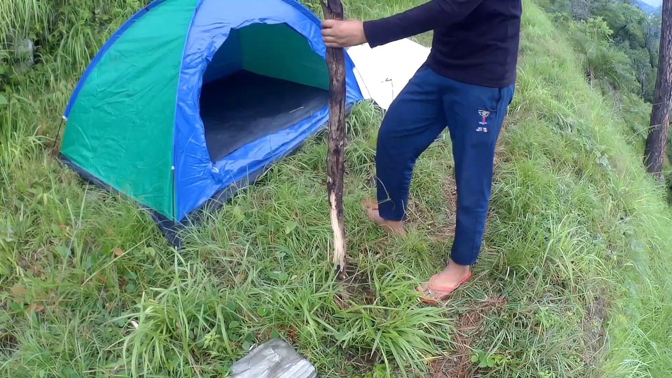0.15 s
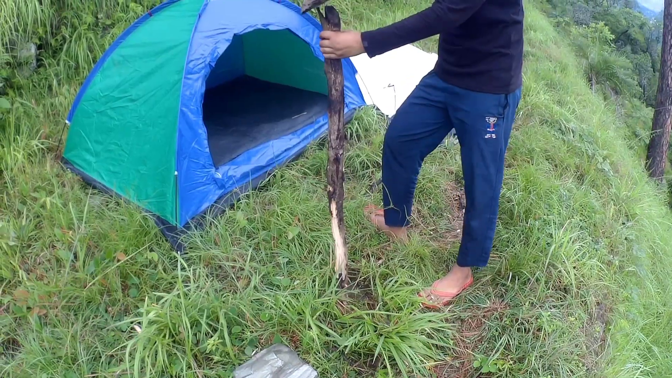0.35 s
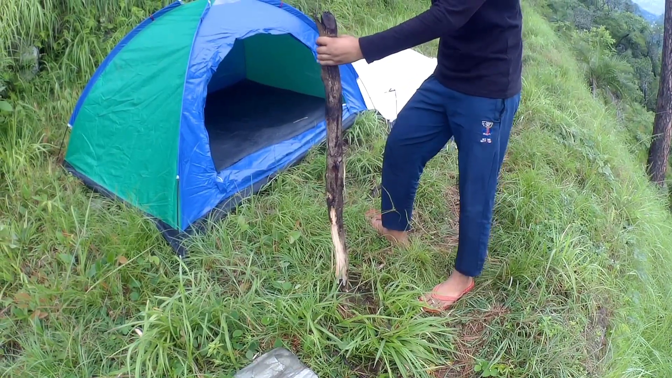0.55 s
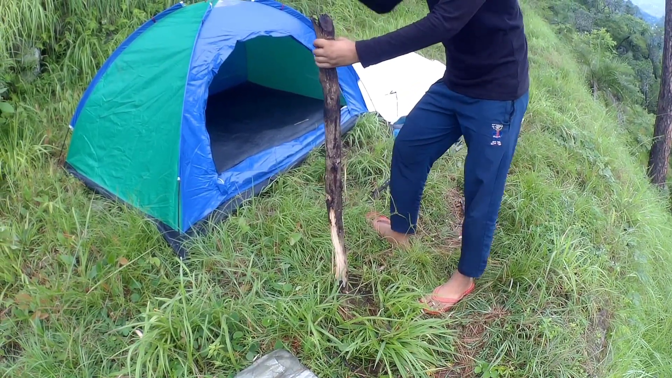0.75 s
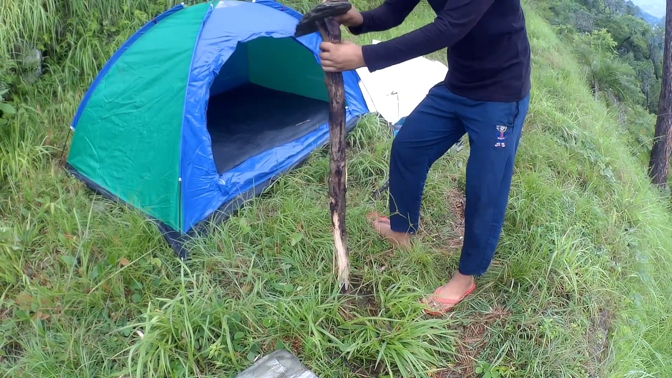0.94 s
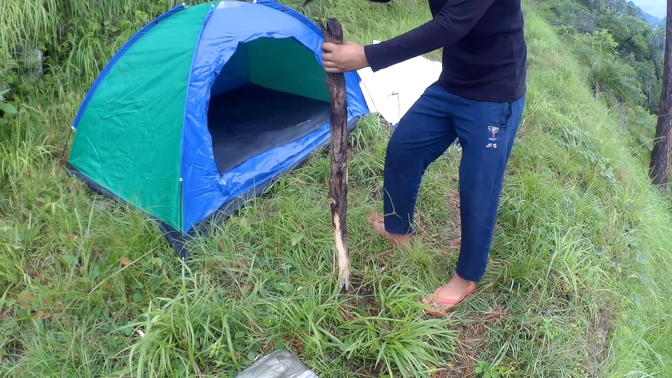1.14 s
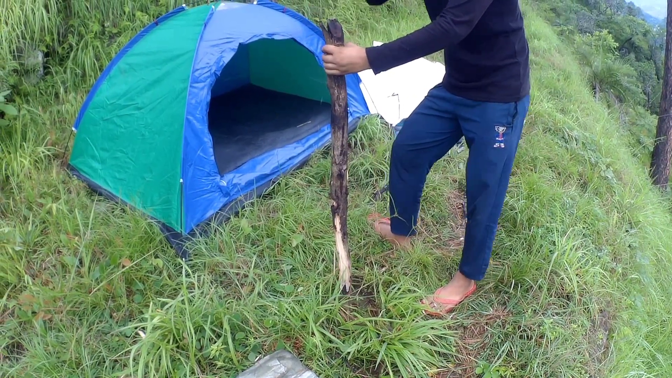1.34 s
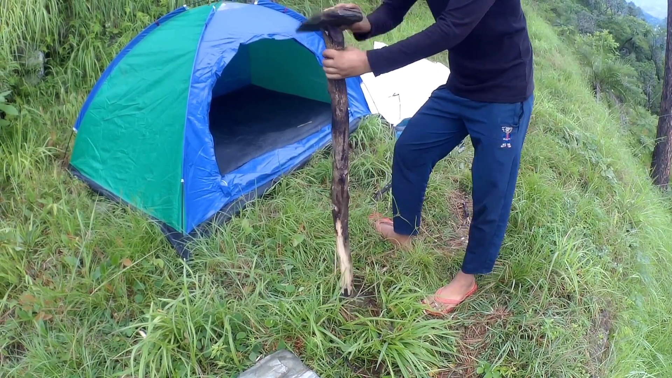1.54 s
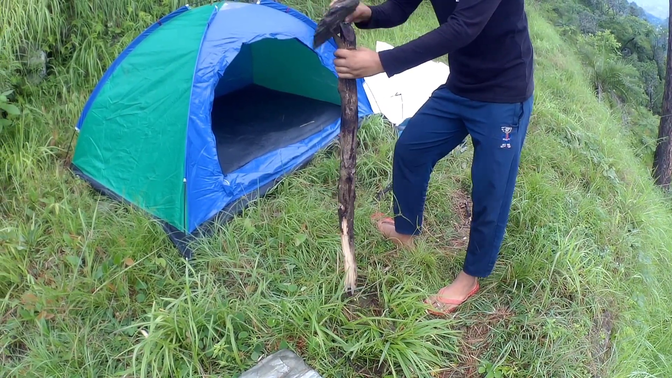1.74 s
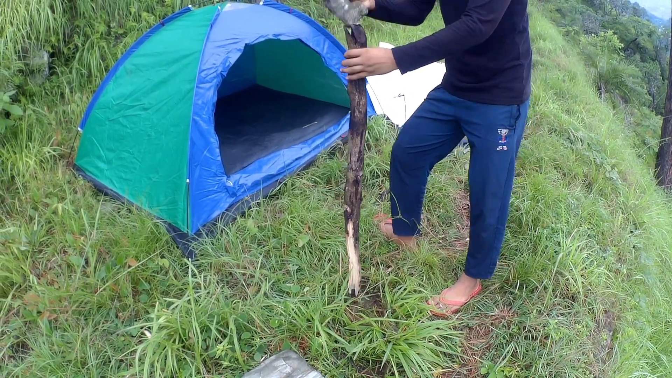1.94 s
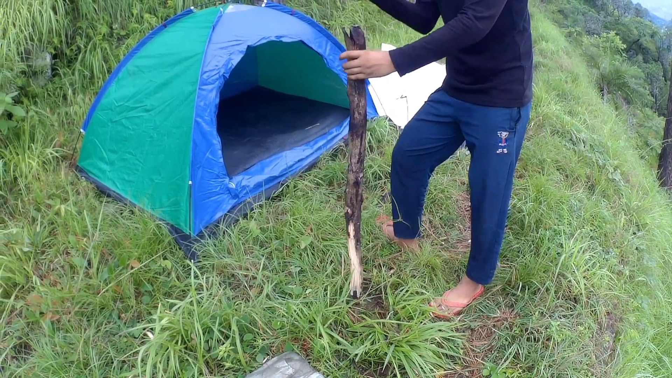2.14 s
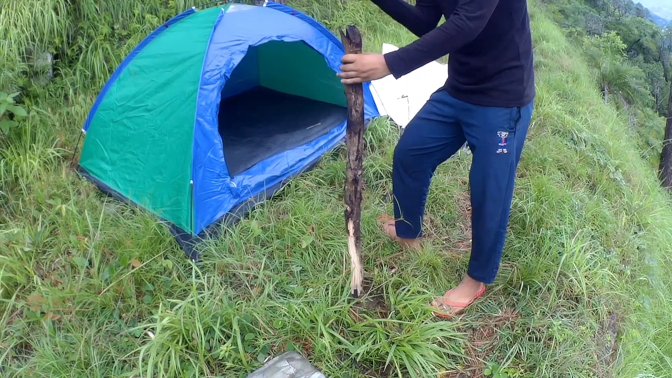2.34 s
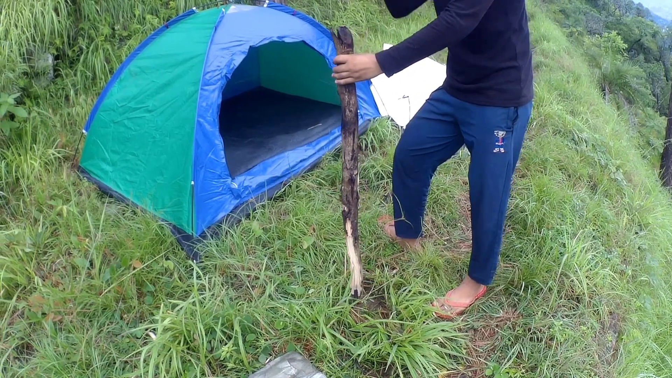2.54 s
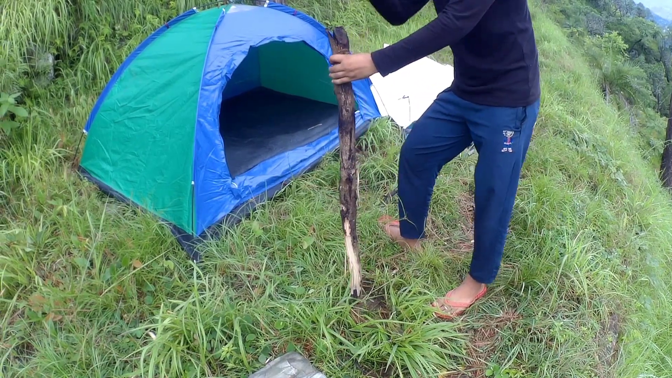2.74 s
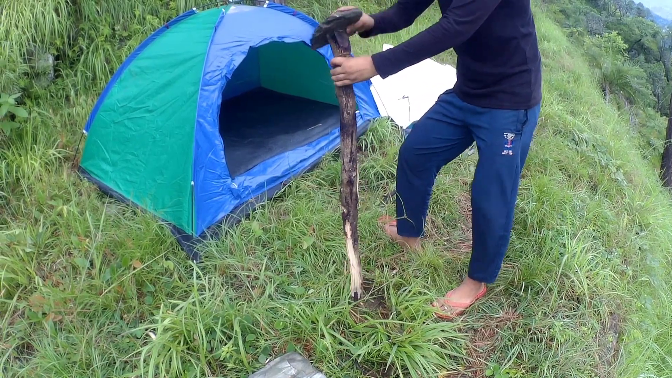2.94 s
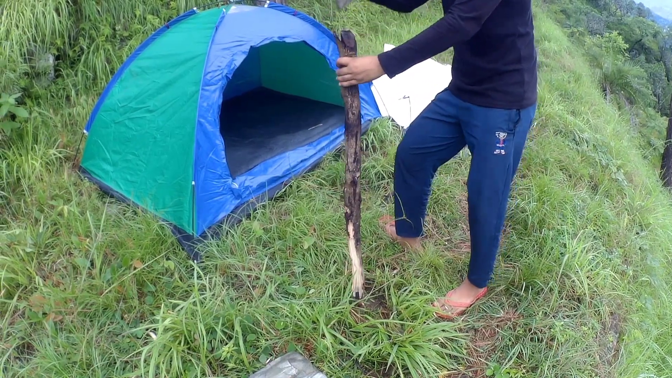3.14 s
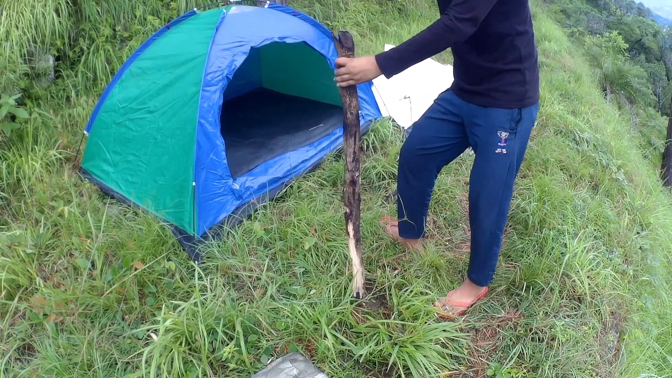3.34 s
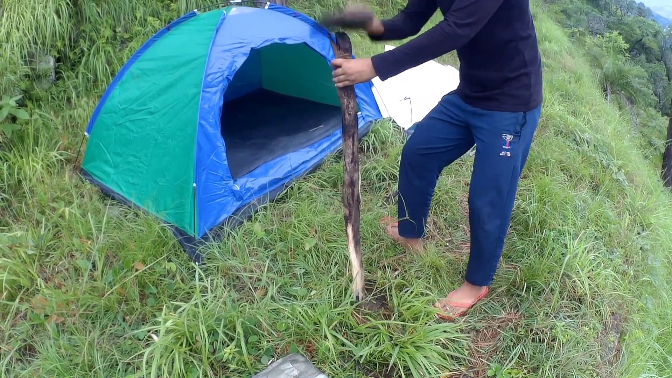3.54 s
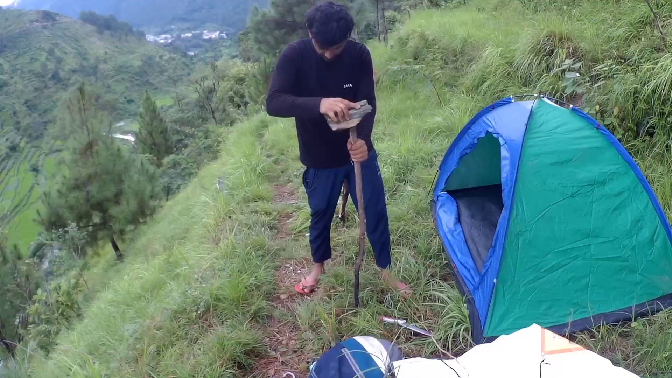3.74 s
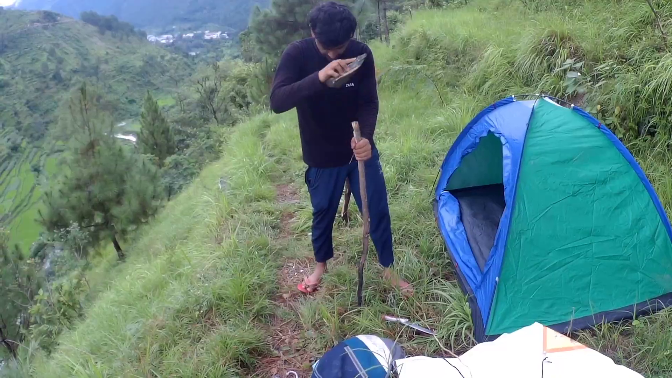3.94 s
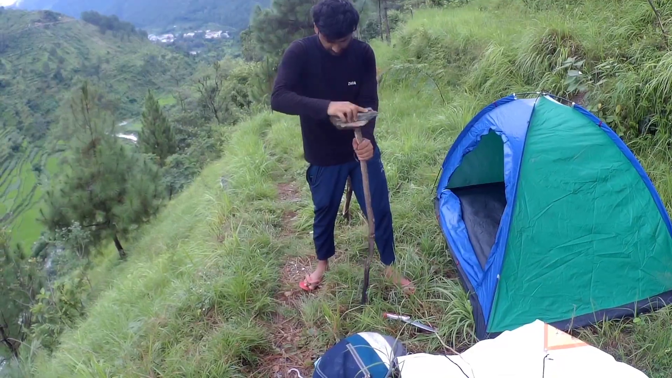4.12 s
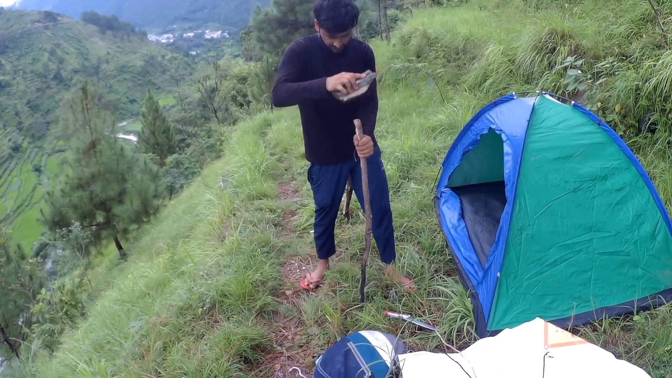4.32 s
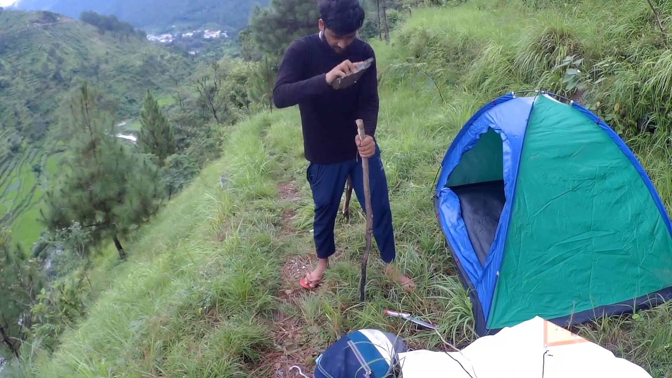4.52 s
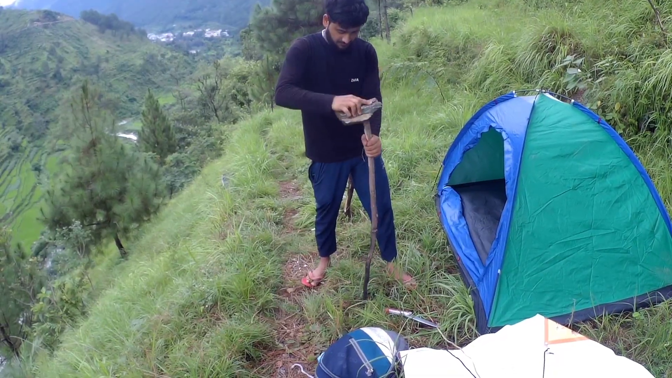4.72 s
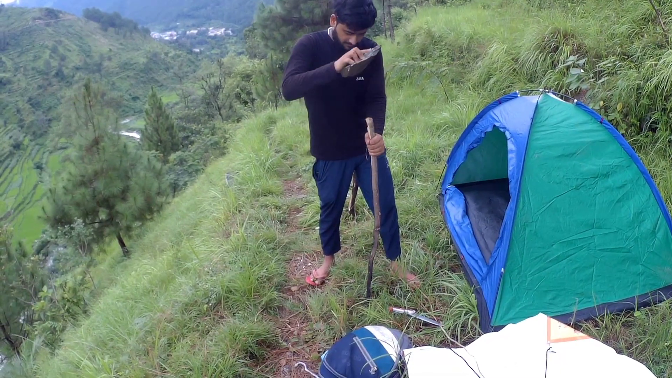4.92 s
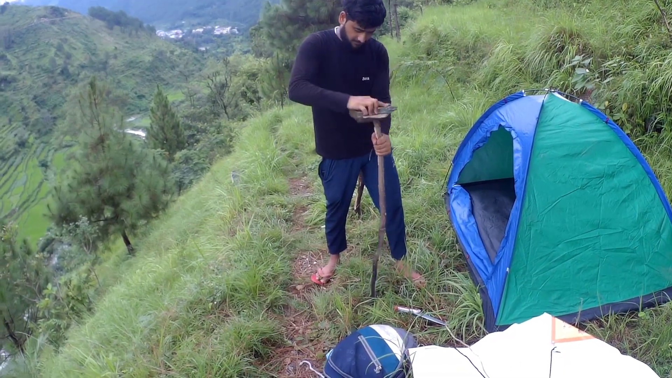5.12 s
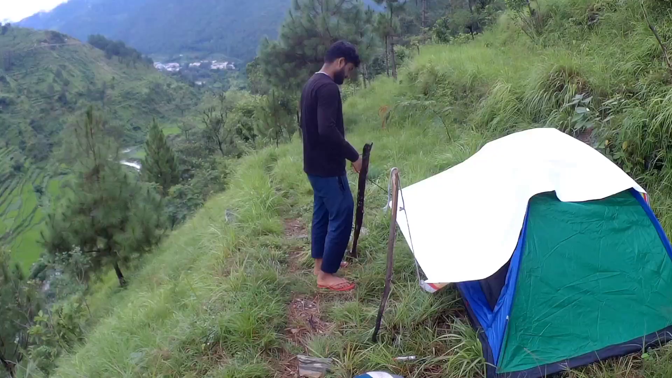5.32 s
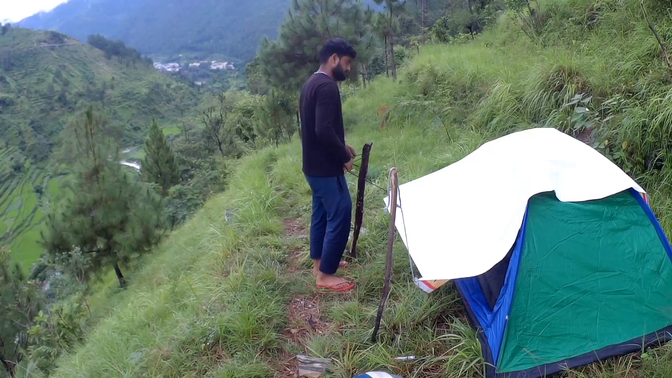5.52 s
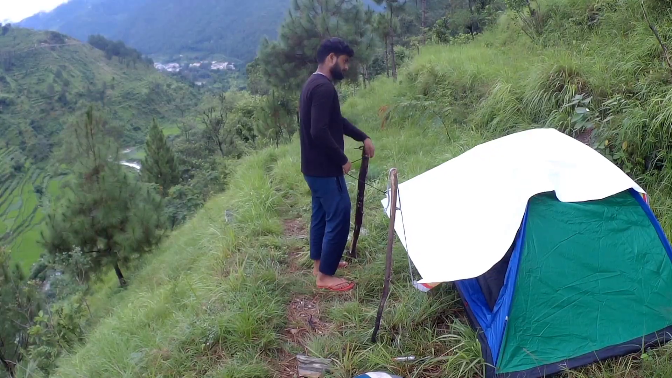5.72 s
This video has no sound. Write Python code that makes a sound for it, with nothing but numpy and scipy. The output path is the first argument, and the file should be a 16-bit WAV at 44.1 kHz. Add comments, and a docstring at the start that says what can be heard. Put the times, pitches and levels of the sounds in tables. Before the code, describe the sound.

On an open hillside, a stone drives a thick wooden stake into turf with five dry, sharp knocks close to the microphone. Each has a low thud from the ground and a short, faint echo, and three are followed by a small bounce. Then, further off, the stone gives a thinner stake three light, gritty taps. A soft, steady rush of valley air with a thin hiss runs underneath.

```python
"""An open valley rushes steadily under a thin hiss. A flat stone drives a wooden stake into the
grassy hillside: five dry knocks, three with a small rebound. Each blow rings the wood and shoves
the stake into the turf, which thuds; the slope returns a short echo and a faint wash.
Then, further off, the stone gives a thinner stake three light, gritty taps as a soft gust passes."""
import sys
import numpy as np
from scipy import signal
from scipy.fft import rfft, irfft
from scipy.io import wavfile
from scipy.ndimage import uniform_filter1d

SR = 44100
rng = np.random.default_rng(int(sys.argv[2]) if len(sys.argv) > 2 else 0)


def generate_wav(sig):
    """Save sig (samples, or channels by samples) to the path in sys.argv[1] as 16-bit PCM at SR."""
    pcm = np.round(np.clip(np.atleast_2d(sig).T, -1, 1) * 32767).astype(np.int16)
    wavfile.write(sys.argv[1], SR, pcm)


N = 258864
TIME = np.arange(N) / SR
HIT_TIME = TIME[:SR // 5]  # the time axis of a single hit


def undb(db):
    """Decibels to gain."""
    return 10 ** (np.asarray(db) / 20)


def add(out, start_s, sound):
    """Mix a sound in at its start time."""
    i = int(start_s * SR)
    out[i:i + len(sound)] += sound[:N - i]


def decay(t, t60):
    """Exponential decay, 60 dB down after t60."""
    return np.exp(-np.log(1000) * t / t60)


def noise(spectrum, size, shelf_hz=12600, shelf_db=-10):
    """Noise of unit rms, shaped by an EQ curve and a high shelf."""
    hz, db = np.transpose(spectrum)
    f = np.maximum(np.fft.rfftfreq(size, 1 / SR), 1)
    eq_db = np.interp(np.log(f), np.log(hz), db) + shelf_db * (f > shelf_hz)
    x = irfft(rfft(rng.standard_normal(size)) * undb(eq_db), size)
    return x / x.std()


def wander(rate_hz):
    """Slow, smooth random modulation of unit spread."""
    hold = int(SR / rate_hz)
    steps = np.repeat(rng.standard_normal(N // hold + 1), hold)
    x = uniform_filter1d(uniform_filter1d(steps, hold), hold)[:N]
    return x / x.std()


# air bed by the thick stake: (frequency [Hz], level [dB])
NEAR_AIR_EQ = [(15, -47), (25, -6.5), (53, -1.5), (92, -3.5), (221, -3), (392, -5.5), (424, -5), (550, -5),
               (713, -5.5), (1260, -8), (1810, -11.5), (2180, -18), (2820, -24.5), (3960, -29.5),
               (12400, -31.5), (16100, -39), (22000, -120)]
# air bed away from it: (frequency [Hz], level [dB])
FAR_AIR_EQ = [(15, -32), (25, -1.5), (54, -5.5), (150, -3.5), (400, -3), (750, -8), (900, -7),
              (1800, -13.5), (2300, -11), (2600, -16.5), (3050, -23.5), (4200, -30.5), (9000, -33),
              (12400, -30.5), (16000, -40)]
def valley(near_db=-49, far_db=-47.5, slacken_db_per_s=0.2862, gust_s=4.49, gust_width_s=0.36, gust_db=2):
    """The valley's rush rides a slackening breeze with one soft gust; the hiss follows more gently."""
    near = (TIME > .152) & (TIME < 3.76)
    air = np.where(near, undb(near_db) * noise(NEAR_AIR_EQ, N), undb(far_db) * noise(FAR_AIR_EQ, N))
    rush = signal.sosfiltfilt(signal.butter(2, 3000, fs=SR, output="sos"), air)
    hiss = air - rush
    gust = np.exp(-((TIME - gust_s) / gust_width_s) ** 2)
    breeze_db = 0.31 - slacken_db_per_s * TIME + gust_db * gust
    waver_db = 0.22 * wander(rate_hz=4.1)
    return rush * undb(breeze_db + waver_db) + hiss * undb(.6 * breeze_db - 0.23)


# tone of the outdoor reverb tails: (frequency [Hz], level [dB])
TAIL_EQ = [(70, -56), (220, -4.5), (500, -2), (1000, 4.5), (1800, -5), (2600, 6.5), (5000, -32),
           (10000, -36)]
def hillside(x, echo_s=.0156, echo_db=-19, scatter_db=-24, scatter_t60=0.062,
             wash_db=-21.5, wash_t60=1.13):
    """Add a dull echo off the slope, scatter from the ground close by and a faint wash from the trees."""
    dull = signal.sosfilt(signal.butter(1, 700, fs=SR, output="sos"), x)
    out = x + undb(echo_db) * np.interp(TIME - echo_s, TIME, dull, left=0)
    t = TIME[:SR]
    attack = 1 - decay(t, 0.022)
    for db, t60 in ((scatter_db, scatter_t60), (wash_db, wash_t60)):
        tail = noise(TAIL_EQ, len(t)) * decay(t, t60) * attack
        midrange_gain = np.sqrt(np.mean(abs(rfft(tail)[200:2000]) ** 2))
        out = out + undb(db) * signal.fftconvolve(x, tail / midrange_gain)[:N]
    return out


# rumble of the shuddering turf: (frequency [Hz], level [dB])
TURF_EQ = [(20, -11), (50, 0.5), (110, -6), (200, -1), (500, -30), (2000, -53)]
def turf(thud_hz=51, thud_db=-21.5, shudder_db=-30, lag_s=0.0053):
    """Each knock shoves the thick stake into the turf, which answers with a low thud and a shudder."""
    out = np.zeros(N)
    attack = 1 - decay(HIT_TIME, 0.053)
    thud = undb(thud_db) * np.sin(2 * np.pi * thud_hz * HIT_TIME) * decay(HIT_TIME, t60=0.2)
    for start_s, knock_db, *_ in KNOCK_CUES:
        shudder = undb(shudder_db) * noise(TURF_EQ, len(HIT_TIME)) * decay(HIT_TIME, t60=0.38)
        add(out, start_s + lag_s, undb(knock_db) * (thud + shudder) * attack)
    return out


# bright grit of stone on wood: (frequency [Hz], level [dB])
GRIT_EQ = [(1500, -12), (2700, 7), (3400, 14), (4300, 5), (5400, 2), (6800, 5), (8500, -3), (12000, -2)]
# slips on the thin stake: (time [s], level [dB], length [s])
SCRAPE_CUES = [(4.215, -60, .025), (4.720, -55.5, 0.024), (5.188, -65, .03)]
def scrapes(grain_samples=60, grain_spread_db=3.2):
    """Grainy hiss as the stone slides a little on the stake's head."""
    out = np.zeros(N)
    size = len(HIT_TIME)
    for start_s, db, length_s in SCRAPE_CUES:
        grains = undb(grain_spread_db * np.repeat(rng.standard_normal(size), grain_samples)[:size])
        envelope = (1 - decay(HIT_TIME, 0.016)) * np.exp(-(HIT_TIME / length_s) ** 2)
        add(out, start_s, undb(db) * envelope * grains * noise(GRIT_EQ, size))
    return out


def strike(modes, contact_s, tuning=(1, 1), colour_db=(0, 0, 0), tilt_db_per_octave=0):
    """One push rings a stake: longer contact is duller; the landing spot tunes and weights the modes."""
    hz, db, t60 = np.transpose(modes)
    upper = hz > 775
    db = db + np.interp(hz, (520, 950, 1550, 2200), (0, *colour_db))
    db = db + 0.96 * rng.standard_normal(len(hz))
    db = db + tilt_db_per_octave * np.minimum(np.log2(hz / 1550), 0)  # thins the low end
    tuned_hz = hz * np.where(upper, tuning[1], tuning[0])
    partials = np.cos(2 * np.pi * tuned_hz[:, None] * HIT_TIME) * decay(HIT_TIME, t60[:, None])
    # the low modes jump at once; the upper ones build up as the wave runs along the stake
    attack = 1 - upper[:, None] * np.exp(-HIT_TIME / 0.0014)
    ring = undb(db) @ (partials * attack)
    # the force swells and falls; the crushed wood of the head takes the treble
    push = HIT_TIME ** 2 * np.exp(-5 * HIT_TIME / contact_s)
    push = signal.sosfilt(signal.butter(4, 2700, fs=SR, output="sos"), push / push.sum())
    return signal.fftconvolve(ring, push)[:len(HIT_TIME)]


def blow(modes, crackle_eq, tuning, colour_db, *, touch_db, touch_s, touch_tilt, seat_s,
         face_db, contact_s, crackle_db, crackle_t60):
    """The stone's edge touches, light and thin; seat_s later its face lands. The wood crackles."""
    touch = undb(touch_db) * strike(modes, touch_s, tuning, colour_db, touch_tilt)
    face = undb(face_db) * strike(modes, contact_s, tuning, colour_db)
    late_face = np.interp(HIT_TIME - seat_s, HIT_TIME, face, left=0)
    # the crackle holds while the stone seats, then dies
    attack = 1 - np.exp(-HIT_TIME / .0004)
    release = decay(np.maximum(HIT_TIME - seat_s, 0), crackle_t60)
    crackle = undb(crackle_db) * attack * release * noise(crackle_eq, len(HIT_TIME))
    return touch + late_face + crackle


# thin stake's modes, damped by hand and soil: (frequency [Hz], level [dB], t60 [s])
THIN_MODES = [(268, -2, 0.033), (306, -7.5, .034), (477, -15, 0.031), (940, -1, 0.013), (1430, -25, 0.011),
              (2190, -9, 0.028)]
# hits on it: (time [s], level [dB], contact [s], low-mode tuning [ratio], upper-mode tuning [ratio])
TAP_CUES = [(4.2150, -34, 0.00019, 1.1, 0.93), (4.7048, -28, 0.00042, 0.92, 1.04),
            (5.1895, -25.5, 0.0012, 0.92, 0.95)]
def taps():
    """Light taps on the thin stake, each two quick contacts; the later taps land firmer and duller."""
    out = np.zeros(N)
    for start_s, db, contact_s, *tuning in TAP_CUES:
        tap = blow(THIN_MODES, GRIT_EQ, tuning, colour_db=(4, 0, 0),
                   touch_db=-30, touch_s=0.00021, touch_tilt=3.5, seat_s=0.00319,
                   face_db=db, contact_s=contact_s, crackle_db=-60, crackle_t60=0.076)
        add(out, start_s, tap)
    return out


# bounces on the thick stake: (time [s], level [dB], contact [s])
REBOUND_CUES = [(.986, -30.5, 0.0023), (1.632, -24, 0.0019), (2.9319, -22, 0.0016)]
def rebounds():
    """The stone drops back on the thick stake, a soft contact that wakes mainly the low modes."""
    out = np.zeros(N)
    for start_s, db, contact_s in REBOUND_CUES:
        add(out, start_s, undb(db) * strike(THICK_MODES, contact_s))
    return out


# thick stake's modes, damped by hand and soil: (frequency [Hz], level [dB], t60 [s])
THICK_MODES = [(188, -31.5, 0.045), (236, -10.5, 0.039), (300, -3.5, .025), (413, -0.5, 0.031),
               (469, -23, 0.078), (948, -3, 0.023), (964, -10.5, 0.034), (1513, -12, 0.04),
               (1595, 1.6, 0.019), (1658, -5, 0.017), (1820, -4, 0.022), (2260, -1.5, 0.012),
               (2385, -6.5, .014)]
# crackle of its head: (frequency [Hz], level [dB])
CRACKLE_EQ = [(200, -19), (800, 4.5), (2300, 4), (2900, -3.5), (3700, -4), (4800, -17.5), (5700, -12.5),
              (8000, -19.5), (9500, -34), (12000, -44)]
# hits on it: (time [s], level [dB], crackle [dB], low-mode tuning [ratio], upper-mode tuning [ratio],
# colour at 950 Hz [dB], colour at 1550 Hz [dB], colour at 2200 Hz [dB])
KNOCK_CUES = [(0.2755, -17.5, -40.5, 1, 0.89, -8, 1, 2.5), (0.9284, -14.5, -40.5, 0.97, 0.919, 1, -3.2, -6),
              (1.5834, -12.5, -33.5, 1.032, 0.917, 3, -0.6, 6.5),
              (2.8861, -11.5, -35.5, 1.01, 0.96, 3.5, 4, 5),
              (3.6194, -11.5, -31.5, 1.09, 0.96, -3.5, 6.3, 2.3)]
def knocks(first_seat_s=.00403, sooner_s_per_knock=.00009):
    """Full blows on the thick stake: each flattens its head, so the stone seats sooner on the next."""
    out = np.zeros(N)
    for count, (start_s, db, crackle_db, low_tuning, upper_tuning, *colour_db) in enumerate(KNOCK_CUES):
        seat_s = first_seat_s - sooner_s_per_knock * count
        knock = blow(THICK_MODES, CRACKLE_EQ, (low_tuning, upper_tuning), colour_db,
                     touch_db=db - 8, touch_s=0.00024, touch_tilt=0.5, seat_s=seat_s,
                     face_db=db, contact_s=0.00023, crackle_db=crackle_db, crackle_t60=0.04)
        add(out, start_s, knock)
    return out


def scene():
    """Mono mix: both stakes with the hillside's echo, over the turf's thuds and the valley bed."""
    stone_on_wood = knocks() + rebounds() + taps() + scrapes()
    return (hillside(stone_on_wood) + turf() + valley())[None]


# brief dips in the whole mix: (time [s], length [s], level [dB])
DIP_CUES = [(.151, .011, -8), (3.7505, .0215, -45), (3.772, .012, -5), (5.377, .009, -13)]
def record(dry, top_hz=15300):
    """The level dips briefly a few times, and a steep low-pass cuts the top."""
    dip_db = sum(db * ((TIME >= start_s) & (TIME < start_s + length_s))
                 for start_s, length_s, db in DIP_CUES)
    gain = uniform_filter1d(undb(dip_db), size=60)
    return signal.sosfilt(signal.ellip(8, .2, 70, top_hz, fs=SR, output="sos"), dry * gain)


dry = scene()
out = record(dry)
generate_wav(out)
```